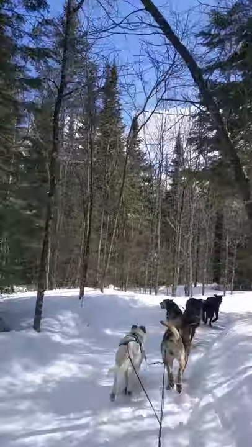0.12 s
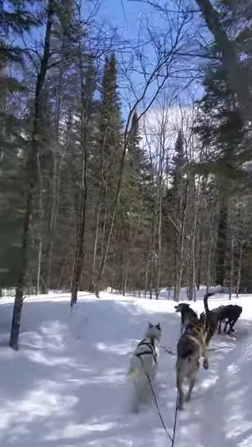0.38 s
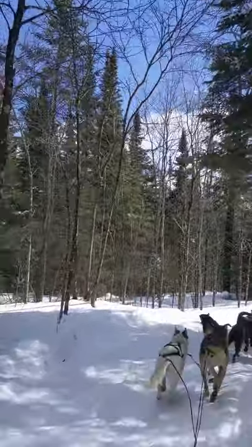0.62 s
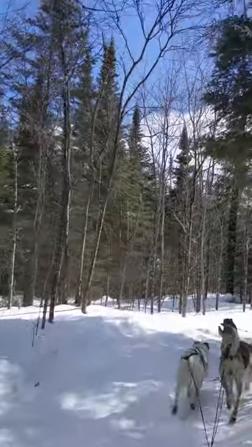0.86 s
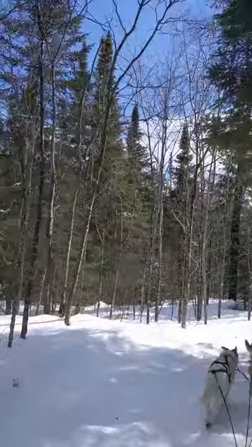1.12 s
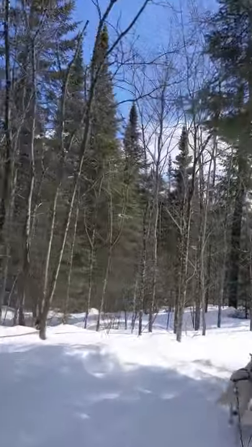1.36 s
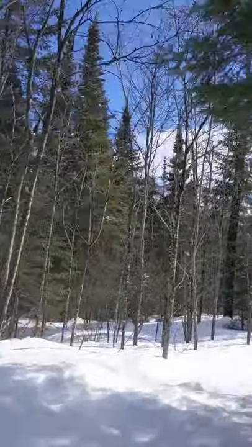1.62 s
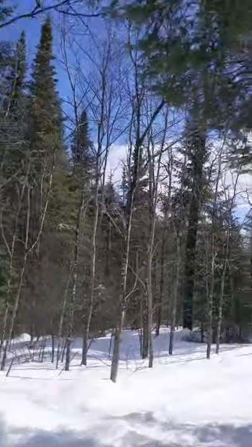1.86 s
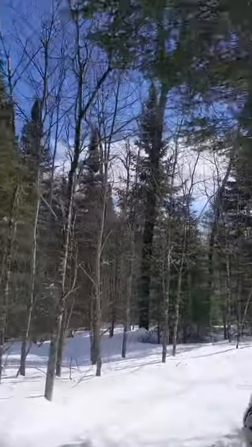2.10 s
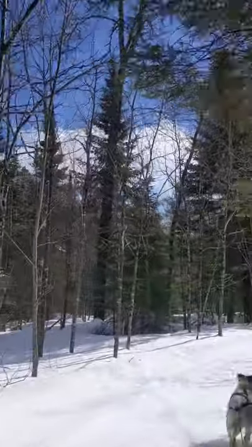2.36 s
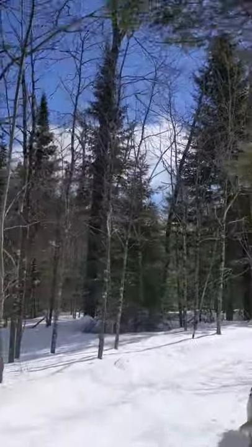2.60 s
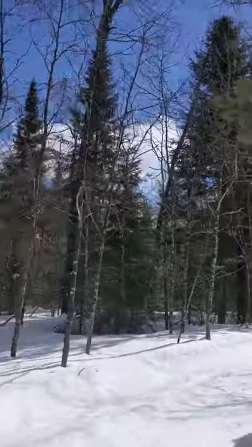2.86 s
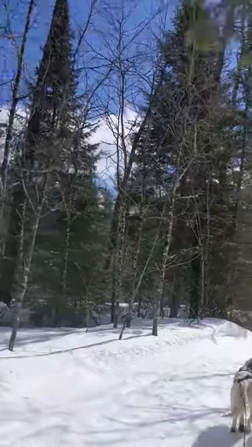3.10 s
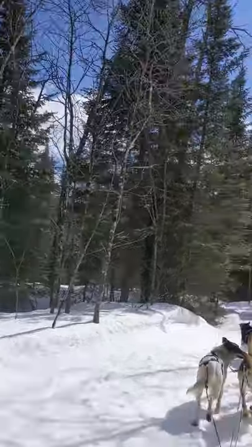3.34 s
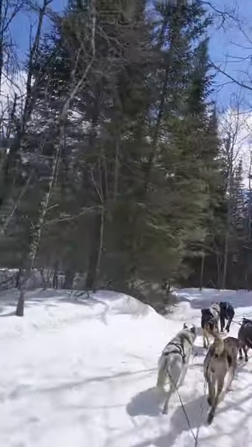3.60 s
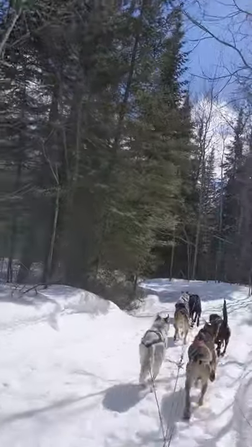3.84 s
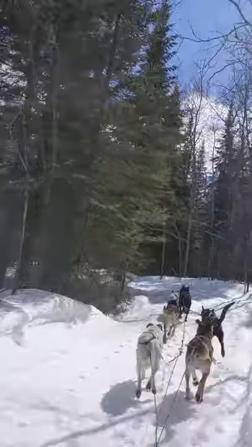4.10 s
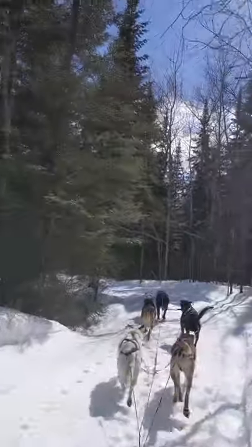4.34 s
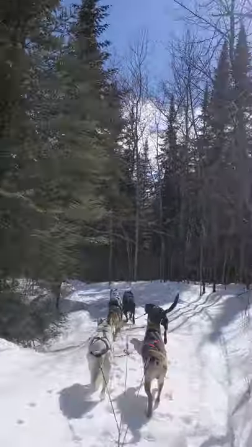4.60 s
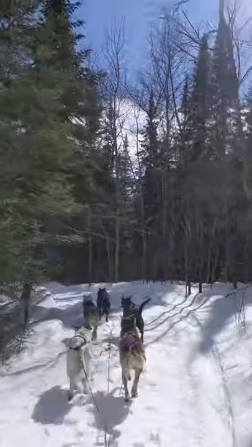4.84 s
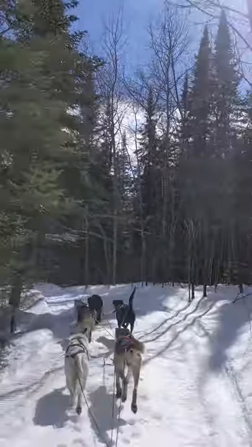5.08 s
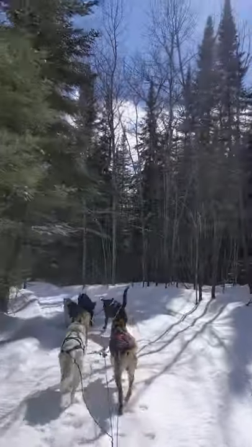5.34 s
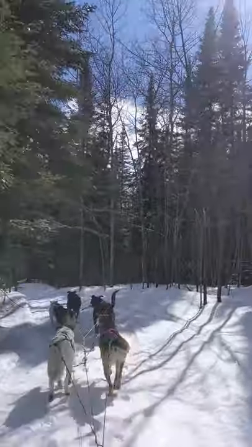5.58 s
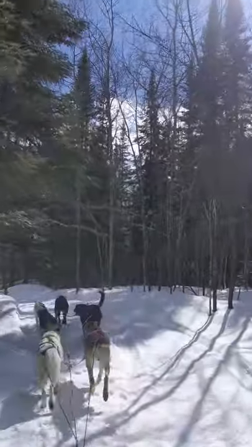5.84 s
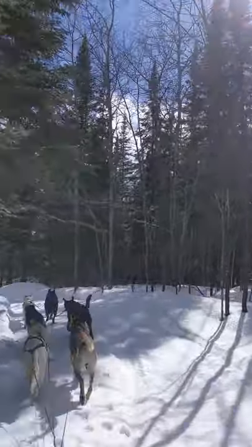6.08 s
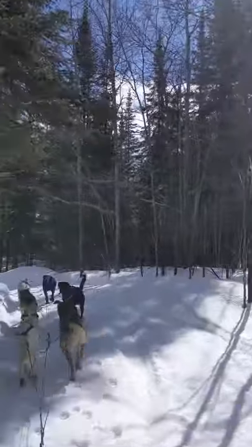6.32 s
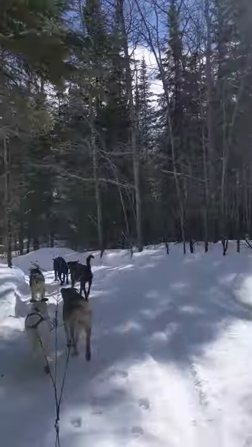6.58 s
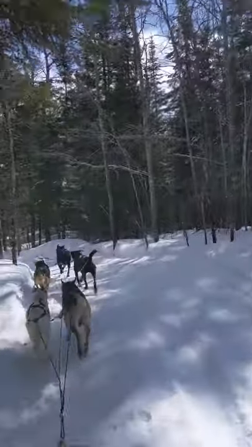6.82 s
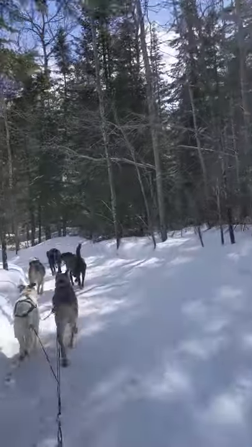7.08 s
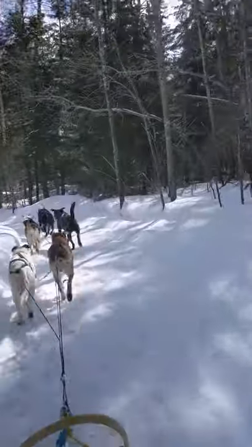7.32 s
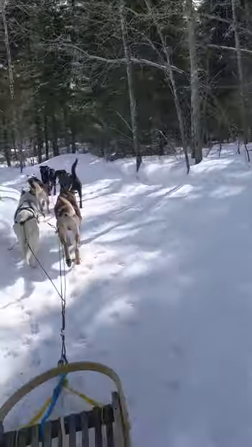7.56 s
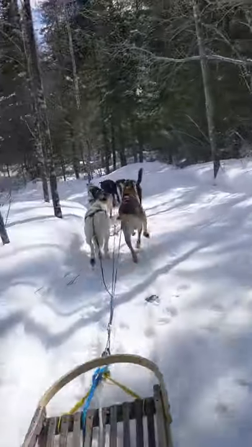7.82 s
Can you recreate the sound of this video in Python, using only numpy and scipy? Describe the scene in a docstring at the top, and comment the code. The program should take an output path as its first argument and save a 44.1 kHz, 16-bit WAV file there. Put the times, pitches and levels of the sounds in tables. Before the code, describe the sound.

A wooden sled pulled over packed snow, heard close and dry from a hand-held phone outdoors. From 0 s, low wind buffets the left side in quick, fuzzy gusts, while the right holds a softer rumble, faint runner hiss and small woody clicks. Wind pops hit around 1.2 and 1.8 s. Near 2.5-2.7 s come swooshes, sharper clicks and hard dull knocks, the loudest at 2.66 s. Wind tears roughly from 2.8 to 3.9 s, with a heavy flapping gust at 3.1-3.2 s and a bright spray of snow. A joint creaks briefly at 4-4.5 s. Gusts weaken after 4.5 s; a knock lands at 5.15 s, and hiss, light scrapes and ticks continue. By 7 s the left wind has almost gone, exposing a cluster of low knocks at 7-7.5 s, then rising snow hiss and fizz to the end at about 7.9 s.

```python
"""Dog sled on packed snow

A wooden dog sled glides over a forest trail, heard from a hand-held phone with two microphone ports.
Wind is shaped noise made separately for each port. Runner hiss, swish and fizz are patchy, grainy noise.
Clicks, scrapes and creaks are noise ringing in the wood; knocks are short low pushes with a crunch of snow."""
import sys
import numpy as np
from scipy import signal
from scipy.fft import rfft, irfft, next_fast_len
from scipy.io import wavfile
from scipy.ndimage import uniform_filter1d

SR = 44100
rng = np.random.default_rng(int(sys.argv[2]) if len(sys.argv) > 2 else 0)


def digitize_waveform(pressure):
    """Quantize a signal to 16-bit integers and store it at the path in sys.argv[1].

    Rows of a 2-D input are taken as channels; values are limited to [-1, 1].
    """
    field = np.atleast_2d(pressure).T
    bounded = np.clip(field, -1, 1)
    quanta = np.round(bounded * 32767).astype(np.int16)
    wavfile.write(sys.argv[1], SR, quanta)


def boost(x):
    """Linear amplitude factor 10**(x/20) for a level x in decibels (scalar or array-like)."""
    u = np.asarray(x, float) / 20
    return 10 ** u


N = 350154  # length in samples
PORT_LAG = 20  # samples by which airborne sound reaches the left port later


def evened(x):
    """Scales to rms 1."""
    return x / np.sqrt(np.mean(x ** 2) + 1e-20)


def read(points, hz):
    """Reads a spectrum in dB, joined on a log-frequency axis."""
    f, value = np.transpose(points)
    return np.interp(np.log(hz + 1), np.log(f + 1), value)


def curves(rows):
    """Columns of a time table, joined by straight lines at every sample."""
    s, *columns = np.transpose(rows)
    return [np.interp(np.arange(N) / SR, s, c) for c in columns]


def colour(x, points):
    """Filters by a spectrum given in dB."""
    size = next_fast_len(N + 4096)
    gain = boost(read(points, np.fft.rfftfreq(size, 1 / SR)))
    return irfft(rfft(x, size) * gain, size)[:N]


def lumps(rate_hz, depth_db):
    """A random gain that wobbles up to about rate_hz, rms 1."""
    lowpass = signal.butter(2, rate_hz, fs=SR, output="sos")
    wobble = signal.sosfilt(lowpass, rng.standard_normal(N))
    return evened(boost(depth_db * np.clip(evened(wobble), -3, 3)))


def resonate(x, hz, width_hz):
    """Lets through a band around hz: shifts hz down to zero, smooths, and shifts back."""
    turn = np.exp(2j * np.pi * np.cumsum(hz * np.ones(len(x))) / SR)
    r = np.exp(-np.pi * width_hz / SR)
    return 2 * (turn * signal.lfilter([1 - r], [1, -r], x / turn)).real


def add(mix, s, sound):
    """Mixes a two-port sound in at s seconds."""
    part = mix[:, round(s * SR):][:, :sound.shape[1]]
    part += sound[:, :part.shape[1]]


def swells(bed_db, rows, rise_s, fall_s):
    """Each row lifts the level out of its bed to a peak, holds it and lets it sink back."""
    t = np.arange(0, N, 64) / SR  # one value every 64 samples is enough
    s, held, peak_db = np.transpose(rows)[:, :, None]
    rising = 1 + (t - s) / rise_s
    falling = 1 - (t - s - held) / fall_s
    share = np.clip(np.minimum(rising, falling), 0, 1)
    bed_points = (bed_db * np.ones(N))[::64]
    lift = (share * np.maximum(peak_db - bed_points, 0)).max(0)
    return bed_db + np.interp(np.arange(N) / SR, t, lift)


def lifted(beds, events, rise_s, fall_s):
    """One swelling level for each bed, from the matching peak column of the events."""
    levels = []
    for k, bed in enumerate(beds):
        rows = [(s, held, peaks[k]) for s, held, *peaks in events]
        levels.append(swells(bed, rows, rise_s, fall_s))
    return levels


def rattle(ms, draw):
    """A hard first contact, then a puff of noise that dies away."""
    u = np.arange(len(draw)) / SR * 1000 / ms
    puff = draw * (np.exp(-2.2 * u ** 2) + 0.2 * np.exp(-.6 * u))
    puff[0] = 7.7
    return puff


def burst(drive, hz, width_hz):
    """The puff ringing near hz."""
    return evened(resonate(resonate(drive, hz, 2 * width_hz), hz, width_hz))


def thump(hz, ms):
    """A short low push, quick to rise and fading over about ms; peak 1."""
    t = np.arange(round(ms * SR / 250)) / SR
    u = t * 1000 / ms
    push = np.sin(2 * np.pi * hz * t) * np.minimum(u / 0.12, 1) * np.exp(-2.5 * u ** 2)
    return push / abs(push).max()


# eddy spectrum against its own pitch: (multiple of the pitch [ratio], level [dB])
EDDY_SHAPE = [(.1, -13), (.3, -5.5), (.7, -2), (1.3, -1.5), (1.9, -8), (2.8, -18), (5, -44)]


def eddies(pitch_hz):
    """Noise whose whole spectrum stretches with the eddy pitch; steady power."""
    frames = N // 256 + 6
    pitch = pitch_hz[np.minimum(np.arange(frames) * 256, N - 1)]
    multiple, db = np.transpose(EDDY_SHAPE)
    ratio = np.fft.rfftfreq(1024, 1 / SR)[:, None] / pitch + 1e-3
    a, b = rng.standard_normal((frames, 513, 2)).T
    shape = boost(np.interp(np.log(ratio), np.log(multiple), db, right=-100)) / np.sqrt(pitch)
    return evened(signal.istft((a + 1j * b) * shape, nperseg=1024, noverlap=768)[1][:N])


# wind on the left port between gusts:
# (time [s], buffeting [dB], eddy pitch when a gust is 5 dB above the lull [Hz], sharp-edged tearing [dB])
LEFT_LULL = [(0.0, -30, 170, -54), (0.76, -29.5, 166, -64), (1.35, -28.5, 169, -54.5), (1.7, -24, 217, -48),
             (2.3, -28, 180, -54), (2.65, -26.5, 179, -46), (2.82, -27.5, 134, -45), (3.05, -26, 193, -37),
             (3.14, -26, 78.4, -31), (3.23, -27, 105, -37), (3.39, -25.5, 232, -27.5),
             (3.8, -26.5, 147, -35.5), (3.95, -25.5, 214, -35), (4.45, -29, 154, -56),
             (5.1, -36.5, 85.5, -61), (5.33, -40, 94, -53), (5.55, -33, 134, -50), (5.85, -37, 104, -55),
             (6.45, -32.5, 101, -60), (6.95, -55, 89.5, -54), (7.1, -50, 170, -54), (7.5, -53, 163, -54),
             (7.66, -49, 175, -52.5), (7.93, -48, 220, -46)]
# gusts on the left port: (top reached [s], held [s], buffeting [dB], tearing [dB])
LEFT_GUSTS = [(.14, 0.034, -23.5, -45), (.27, 0.054, -22, -55), (0.431, .11, -24, -50),
              (.66, 0.018, -22.5, -42), (0.842, 0.076, -19.5, -36), (.97, 0.11, -25.5, -44),
              (1.099, 0.12, -19, -38.5), (1.2, 0.089, -18.5, -37.5), (1.41, 0.014, -25, -44),
              (1.54, 0.073, -18, -33), (1.68, 0.056, -19.5, -33.5), (1.82, 0.066, -18.5, -32.5),
              (1.94, .05, -22, -50), (2.03, 0.023, -22.5, -35), (2.19, 0.039, -24.5, -49),
              (2.328, 0.026, -18, -26), (2.49, 0.0033, -23, -31.5), (2.55, 0.16, -24, -36.5),
              (2.829, 0.013, -18, -32), (2.99, .05, -21, -29), (3.059, 0.034, -18.5, -18),
              (3.12, 0.047, -16, -23), (3.27, 0.057, -19.5, -25), (3.34, 0.071, -20.5, -25),
              (3.54, 0.058, -20, -25.5), (3.73, 0.036, -19.5, -25.5), (3.82, 0.1, -22, -31),
              (3.91, 0.13, -22, -32), (4.068, 0.034, -23.5, -40), (4.169, 0.048, -23, -35.5),
              (4.36, 0.014, -19, -35), (4.52, 0.0046, -22.5, -41), (4.65, 0.16, -28.5, -51),
              (4.85, .18, -30.5, -56), (5.11, 0.067, -35, -57), (5.381, 0.0077, -29.5, -53),
              (5.461, 0.022, -23, -57), (5.549, .005, -22, -45), (5.64, 0.037, -27, -41),
              (5.78, 0.0039, -28.5, -55), (5.88, 0.0046, -29, -53), (5.98, .02, -28.5, -54),
              (6.07, .11, -31.5, -54), (6.26, .09, -28, -51), (6.51, 0.019, -30.5, -55),
              (6.619, 0.0029, -29, -53), (6.7, 0.026, -33.5, -55), (6.87, 0.0042, -35, -51),
              (6.98, 0.016, -45, -47), (7.25, 0.0044, -43, -48), (7.33, 0.0042, -42, -49),
              (7.43, .005, -47, -44), (7.56, 0.017, -42, -51)]
# spectrum of the torn edges: (frequency [Hz], density [dB per Hz])
TEARING_COLOUR = [(100, -28), (250, -4), (450, -1), (700, -12.5), (1100, -23.5), (1700, -36.5), (4000, -64)]
# spectrum of the higher rasp in strong tearing: (frequency [Hz], density [dB per Hz])
RASP_COLOUR = [(400, -28), (800, 1.5), (1300, -5), (2000, -17), (3500, -45)]


def wind_left():
    """Eddies shed at the port: a fuzzy pitch that climbs with the gusts, torn at its edges."""
    lull_db, lull_hz, edge_db = curves(LEFT_LULL)
    buffet_db, tear_db = lifted([lull_db, edge_db], LEFT_GUSTS, rise_s=0.052, fall_s=0.059)
    octaves_per_db = 0.0379  # eddies climb as a gust lifts out of the lull
    eddy_hz = lull_hz * 2 ** (octaves_per_db * (buffet_db - lull_db - 5))
    shreds = rng.standard_normal(N) * lumps(72, 3.3)
    buffeting = boost(buffet_db) * eddies(eddy_hz) * lumps(23, 1.2)
    tearing = boost(tear_db) * evened(colour(shreds, TEARING_COLOUR))
    rasp_db = -48 + 1.5 * (tear_db + 23)  # rasp grows faster than the tearing, in dB
    rasp = boost(rasp_db) * evened(colour(shreds, RASP_COLOUR))
    return np.array([buffeting + tearing + rasp, np.zeros(N)])


# wind on the sheltered right port between jolts and puffs: (time [s], low rumble [dB], flutter [dB])
RIGHT_LULL = [(0.0, -46, -44.5), (.4, -44, -48), (1.0, -41, -49.5), (1.7, -35, -48), (2.2, -38, -51),
              (2.8, -35, -50), (3.4, -37, -58), (3.9, -41, -48), (4.45, -41, -50.5), (4.75, -45, -51),
              (5.35, -44, -55), (5.6, -35, -58.5), (6.1, -52, -44), (6.6, -41, -45), (7.1, -54, -45),
              (7.5, -36.5, -41.5), (7.73, -46.5, -45), (7.93, -36, -36)]
# jolts of the sled and puffs that reach the right port: (top reached [s], held [s], rumble [dB], flutter [dB])
RIGHT_JOLTS = [(.13, .02, -29.5, -50), (1.9, .03, -37, -40), (2.47, .02, -35, -49), (2.66, .01, -35, -28),
               (3.1, 0.19, -33, -41), (3.84, 0.087, -40, -39), (4.85, 0.15, -39.5, -49),
               (5.16, .01, -33, -46), (6.27, .05, -40, -39.5), (6.8, 0.037, -31.5, -39.5),
               (6.99, 0.0043, -26.5, -35), (7.23, .02, -43, -36), (7.37, 0.036, -39, -31),
               (7.65, 0.022, -47, -37)]
# spectrum of the rumble: (frequency [Hz], density [dB per Hz])
RUMBLE_COLOUR = [(15, -23), (45, 13.5), (100, 3), (200, -0.5), (400, -26), (1500, -80)]
# spectrum of the flutter: (frequency [Hz], density [dB per Hz])
FLUTTER_COLOUR = [(100, -0.5), (230, 3), (500, -7), (900, -10), (2000, -23.5), (6000, -72)]


def wind_right():
    """Sheltered wind: low rumble and higher flutter, both lumpy noise lifted by jolts of the sled and puffs."""
    rumble_db, flutter_db = lifted(curves(RIGHT_LULL), RIGHT_JOLTS, rise_s=0.1, fall_s=0.054)
    rumble = colour(rng.standard_normal(N) * lumps(13, 3.2), RUMBLE_COLOUR)
    flutter = colour(rng.standard_normal(N) * lumps(69, 4.6), FLUTTER_COLOUR)
    right = boost(rumble_db) * evened(rumble) + boost(flutter_db) * evened(flutter)
    return np.array([np.zeros(N), right])


def patchy(patch_db, crunch, grains_per_s, spread_db):
    """White noise with drifting patches, mixed with crunching snow grains; crunch is their power share."""
    hop, size = 128, 512  # samples
    frames = N // hop + 6
    a, b, patches = rng.standard_normal((frames, size // 2 + 1, 3)).T
    patches = evened(uniform_filter1d(uniform_filter1d(patches, 8, 0), 14, 1))
    bed = signal.istft((a + 1j * b) * boost(patch_db * patches), nperseg=size, noverlap=size - hop)[1][:N]
    strength = boost(spread_db * np.minimum(rng.exponential(1, N), 4))
    train = (rng.random(N) < grains_per_s / SR) * strength
    fading = signal.lfilter([1], [1, -np.exp(-1 / (0.0013 * SR))], train)  # each grain dies in 1.3 ms
    grains = rng.standard_normal(N) * fading
    crunch = np.clip(crunch, 0, 1)
    return np.sqrt(1 - crunch) * evened(bed) + np.sqrt(crunch) * evened(grains)


def ports(near, other, left_colour, right_colour):
    """The left port hears the same grains a little later, mixed with its own."""
    alike = .6
    far = alike * np.roll(near, PORT_LAG) + np.sqrt(1 - alike ** 2) * other
    return np.array([colour(far, left_colour), colour(near, right_colour)])


# runner hiss at the left port: (frequency [Hz], density [dB per Hz])
HISS_LEFT_COLOUR = [(300, -4), (800, -9.5), (1700, -10.5), (2600, -13), (3200, -36), (6000, -70),
                    (15000, -45)]
# runner hiss at the right port: (frequency [Hz], density [dB per Hz])
HISS_RIGHT_COLOUR = [(300, -3), (800, -0.5), (1700, 2.5), (2550, -0.5), (3200, -2.5), (5200, -7),
                     (6300, -9.5), (7500, -18.5), (12500, -19.5), (15000, -24), (15500, -50)]


def runner_hiss(db):
    """Runners rubbing over snow: slightly patchy noise, its level set at the right port."""
    near, other = patchy(1.67, 0.14, 300, 4.8), patchy(1.1, .15, 300, 3.4)
    hiss = ports(near, other, HISS_LEFT_COLOUR, HISS_RIGHT_COLOUR)
    return boost(db) * hiss / hiss[1].std()


# swish at the left port: (frequency [Hz], density [dB per Hz])
SWISH_LEFT_COLOUR = [(1000, 7.5), (2600, -9), (3500, -22), (4300, 1), (5200, -15), (6200, -22), (7800, 2),
                     (10000, -1)]
# swish at the right port: (frequency [Hz], density [dB per Hz])
SWISH_RIGHT_COLOUR = [(1000, -38), (3400, 7), (4300, 6), (5200, 1), (6500, -3), (9000, 0), (12500, -7),
                      (15000, -22)]


def loose_snow_swish(db):
    """Loose snow swishing past: patchier noise, its level set at the left port."""
    near, other = patchy(6.4, .15, 400, 5.4), patchy(1.8, .15, 370, 4.7)
    swish = ports(near, other, SWISH_LEFT_COLOUR, SWISH_RIGHT_COLOUR)
    return boost(db) * swish / swish[0].std()


# spray fizz at the left port: (frequency [Hz], density [dB per Hz])
FIZZ_LEFT_COLOUR = [(6000, -9.5), (7500, -10), (8500, -6.5), (10000, 3), (12500, 3), (15000, 1.5),
                    (16000, -6)]
# spray fizz at the right port: (frequency [Hz], density [dB per Hz])
FIZZ_RIGHT_COLOUR = [(7000, -51), (9000, -29), (12500, -25), (15000, -19), (15500, -50)]


def spray_fizz(db):
    """Fine spray: very high grainy noise, lumpy in level and set at the left port."""
    near, other = patchy(2.5, 0.21, 500, 1.7), patchy(2.2, 0.27, 500, 4.0)
    fizz = ports(near, other, FIZZ_LEFT_COLOUR, FIZZ_RIGHT_COLOUR)
    return boost(db) * fizz / fizz[0].std() * lumps(13.4, 0.55)


# a narrow singing of the runners: (time [s], level [dB])
SINGING_LEVEL = [(0, -56.5), (2.8, -58.5), (3.6, -62.5), (7.93, -74)]


def runner_singing():
    """Noise squeezed into a narrow band sings faintly at the right port."""
    hz, width_hz = 2550, 220
    tone = resonate(resonate(rng.standard_normal(N), hz, width_hz), hz, width_hz)
    right = boost(curves(SINGING_LEVEL)[0]) * evened(tone) * lumps(23, 1.1)
    return np.array([np.zeros(N), right])


# steady glide: (time [s], runner hiss at the right port [dB], fine fizz at the left port [dB])
GLIDE = [(0.0, -47.5, -53.5), (.9, -48, -54.5), (1.4, -48, -55), (1.9, -43.5, -52.5), (2.3, -44, -51),
         (2.8, -49.5, -53), (3.0, -45, -44.5), (3.45, -44, -47.5), (3.9, -49, -56), (4.6, -50, -55),
         (5.05, -53, -56.5), (5.4, -47.5, -50.5), (5.95, -52.5, -57), (6.6, -50, -54.5), (7.1, -53, -50.5),
         (7.45, -46, -48.5), (7.68, -46.5, -40), (7.93, -43, -40)]
# swooshes through loose snow:
# (top reached [s], held [s], hiss at the right port [dB], fizz at the left port [dB], swish there [dB])
SNOW_SWOOSHES = [(.2, 0.072, -45.5, -52.5, -57), (.63, .09, -45.5, -49, -59), (1.01, .005, -42, -49, -69),
                 (1.2, .01, -45.5, -54, -60), (1.38, 0.04, -46, -56, -56), (1.69, 0.063, -43.5, -50, -66),
                 (1.96, 0.014, -40, -50, -64), (2.13, 0.055, -47.5, -51.5, -76),
                 (2.36, 0.051, -46, -49.5, -55), (2.47, 0.0046, -38.5, -47.5, -63),
                 (2.56, 0.0075, -36.5, -41, -61), (2.66, 0.0044, -39.5, -46.5, -65),
                 (2.75, .18, -49, -49, -60), (2.93, .005, -46.5, -51, -52), (3.07, .06, -45, -38, -43),
                 (3.18, 0.079, -41.5, -36, -37), (3.32, 0.066, -41, -45, -64),
                 (4.05, 0.032, -46, -46.5, -47), (4.39, .02, -44.5, -49.5, -57),
                 (4.45, 0.041, -44.5, -46, -57), (4.67, 0.0046, -49, -54, -68), (4.92, .04, -47, -56, -75),
                 (5.16, .005, -48, -53, -52), (5.24, 0.085, -48.5, -48.5, -56.5),
                 (5.58, 0.067, -47, -50.5, -63), (5.78, 0.024, -50, -49.5, -69),
                 (6.05, 0.21, -46.5, -54.5, -72), (6.27, 0.013, -42, -48.5, -61),
                 (6.46, 0.012, -47, -58, -58), (6.82, .02, -45.5, -53, -68), (6.98, 0.0045, -49, -48, -51),
                 (7.14, .005, -55, -48, -60), (7.32, 0.095, -44, -50.5, -54),
                 (7.58, 0.022, -43.5, -44.5, -61), (7.66, 0.053, -50, -42, -51.5)]


def snow():
    """A steady glide lifted by swooshes; each port colours the snow in its own way."""
    swish_bed_db = -63  # between swooshes
    beds = [*curves(GLIDE), swish_bed_db]
    hiss_db, fizz_db, swish_db = lifted(beds, SNOW_SWOOSHES, rise_s=0.067, fall_s=.07)
    return runner_hiss(hiss_db) + loose_snow_swish(swish_db) + spray_fizz(fizz_db) + runner_singing()


# dull knocks: (time [s], pitch [Hz], length [ms], left thump peak [dB], right thump peak [dB])
DULL_KNOCKS = [(0.167, 204, 12, -50, -32), (2.4737, 260, 9, -45, -24), (2.612, 204, 11, -45, -26),
               (2.6555, 500, 3.8, -43, -17), (2.661, 325, 5.1, -41, -14.5), (2.6766, 570, 7.2, -43, -23),
               (3.2038, 269, 8.3, -42, -22), (3.8348, 204, 8.5, -50, -24), (5.1474, 253, 18, -41, -29.5),
               (5.1649, 546, 4.2, -47, -19), (5.1655, 970, 5.4, -50, -17), (5.3114, 215, 13, -49, -29.5),
               (6.044, 301, 5.6, -48, -29), (6.4797, 258, 5.8, -49, -28.5), (6.5745, 240, 11, -31, -28),
               (6.971, 250, 3.3, -36, -22), (7.008, 193, 17, -49, -26), (7.09, 203, 16, -36, -37),
               (7.13, 215, 7, -31, -46), (7.159, 224, 23, -34, -36), (7.2234, 256, 7.2, -23, -26),
               (7.309, 308, 9, -39, -21), (7.367, 250, 8.2, -47, -35), (7.402, 224, 15, -25, -32),
               (7.524, 255, 14, -46, -33)]


def knocks():
    """Low pushes of the frame, each with a quieter crunch of crushed snow."""
    out = np.zeros((2, N))
    crunch_db, crunch_ms = -10.5, 8.3  # level against the thump
    band = signal.butter(2, [250, 1300], "band", fs=SR)
    for s, hz, ms, left_db, right_db in DULL_KNOCKS:
        port_db = np.array([left_db, right_db])
        crunch = signal.lfilter(*band, rattle(crunch_ms, rng.standard_normal(2000)))
        add(out, s, np.outer(boost(crunch_db + port_db), crunch / abs(crunch).max()))
        add(out, s, np.outer(boost(port_db), thump(hz, ms)))
    return out


# bright ticks: (time [s], pitch [Hz], length [ms], peak at the left port [dB])
BRIGHT_TICKS = [(.2451, 14000, 3, -41), (.6303, 12900, 7, -28), (.6544, 12690, 5, -32),
                (2.559, 12300, 8, -27), (2.9236, 12700, 8, -32), (3.5314, 11600, 3, -29),
                (4.0288, 13300, 4.4, -28), (5.7641, 13370, 3, -26.5), (5.8434, 11700, 5.9, -36),
                (5.8679, 11800, 3, -35), (6.2675, 9550, 5.6, -37), (6.8777, 12500, 6, -33)]


def ticks():
    """Tiny rattles ringing very high, a tenth as strong at the right port."""
    out = np.zeros((2, N))
    treble = signal.butter(3, 9000, "high", fs=SR)
    for s, hz, ms, db in BRIGHT_TICKS:
        drive = rattle(ms, rng.standard_normal(1200))
        tick = burst(drive, hz, 1000) + 0.5 * evened(signal.lfilter(*treble, drive))
        add(out, s, np.outer([1, .1], boost(db) * tick / abs(tick).max()))
    return out


# what the frame rings with: (pitch [Hz], filter width [Hz], level before reach and chance [dB])
FRAME_MODES = [(1280, 350, -1.5), (1500, 410, 3), (1870, 380, 2), (2100, 230, -3), (2365, 400, 1),
               (2860, 380, -2.5), (3600, 300, -2), (4900, 510, 3)]


def click(db, hz, ms, draw, chance):
    """A rattle rings the frame's modes, most those near the struck place."""
    drive = rattle(ms, draw)
    crack = signal.lfilter(*signal.butter(2, 6000, fs=SR), drive)
    ring = 0
    for (mode_hz, width_hz, mode_db), c in zip(FRAME_MODES, chance):
        # modes away from the struck place ring less: 22 dB per octave, at most 20 dB
        reach_db = max(-22 * abs(np.log2(mode_hz / hz)), -20)
        ring = ring + boost(mode_db + 2.5 * c + reach_db) * burst(drive, mode_hz, width_hz)
    sound = evened(ring) + 0.046 * evened(crack)
    sound *= boost(db) / abs(sound).max()
    left_db = -21  # against the right port
    return np.array([boost(left_db) * np.roll(sound, PORT_LAG), sound])


# small clicks of frame and lines: (time [s], peak at the right port [dB], struck place [Hz], length [ms])
SMALL_CLICKS = [(0.249, -31, 4470, 3.1), (.4315, -33, 2210, 4.4), (0.531, -33.5, 2500, 1.6),
                (.6134, -24, 3100, 2.1), (.974, -34.5, 4900, 2.3), (1.0038, -25, 2800, 4.6),
                (1.016, -30, 2150, 11), (1.3627, -31, 4900, 2), (1.5164, -24.5, 2460, 3.4),
                (1.6413, -32, 4600, 2.1), (1.7, -21, 2710, 3.8), (1.942, -18.5, 2250, 6.1),
                (2.4477, -24, 1750, 1.9), (2.476, -27, 2000, 2.6), (2.498, -29, 2920, 3),
                (2.5378, -24, 1680, 14), (2.5658, -21, 1620, 2.4), (2.6617, -10.5, 1390, 1.3),
                (2.9216, -18, 2150, 4.7), (2.9212, -23.5, 3600, 3.5), (3.854, -29, 1900, 5.3),
                (4.6657, -19.5, 1930, 2.4), (4.8312, -31, 2100, 4.6), (5.1015, -24, 2043, 5.7),
                (5.1659, -26, 1300, 3.1), (5.254, -27.5, 2230, 9.2), (5.3246, -30.5, 2500, 3.9),
                (5.5831, -29.5, 4560, 2.5), (5.6381, -32, 2290, 5.4), (6.0445, -28.5, 4430, 3.8),
                (6.1302, -25, 1300, 1.7), (6.1305, -36, 4900, 1.5), (6.2383, -30, 1500, 2.4),
                (6.276, -36, 3600, 3), (6.305, -36, 3700, 5), (6.529, -25.5, 2320, 5.2),
                (6.5753, -36, 2400, 6), (6.9725, -36, 1350, 3.2), (7.224, -28, 1550, 5.2)]


def clicks():
    """The listed clicks of frame and lines, and 24 faint ones at random moments."""
    out = np.zeros((2, N))
    faint = []
    for a, b, c, d in rng.random((24, 4)):
        faint.append((a * N / SR, -40 + 5 * b, 1400 * 4.3 ** c, 7.1 * (.5 + d)))
    for s, db, hz, ms in SMALL_CLICKS + faint:
        draw = rng.standard_normal(1200)
        add(out, s, click(db, hz, ms, draw, draw[-len(FRAME_MODES):]))
    return out


# banded scrapes:
# (centre [s], half length [s], main band at the right port [dB], main band [Hz], second band [Hz])
BANDED_SCRAPES = [(3.11, 0.054, -53, 4460, 3200), (3.22, 0.064, -46.5, 4470, 3000),
                  (4.7, 0.062, -52, 1830, 3400), (4.1, 0.095, -49, 1750, 4100),
                  (6.27, 0.062, -46, 1550, 3540), (2.55, 0.02, -37.5, 1800, 1300),
                  (0.43, .025, -45, 950, 970), (.7, 0.024, -48, 2100, 900)]


def scrapes():
    """Rough rubbing that sings in two fuzzy bands and swells then fades."""
    t, out = np.arange(N) / SR, np.zeros(N)
    rub = patchy(1.4, 0.68, 300, 2.4)
    for s, half, db, main_hz, second_hz in BANDED_SCRAPES:
        main = evened(resonate(resonate(rub, main_hz, 600), main_hz, 600))
        second = evened(resonate(resonate(rub, second_hz, 600), second_hz, 600))
        swell = np.exp(-((t - s) / half) ** 2)
        out += boost(db) * swell * (main + .6 * second)
    return np.array([.5 * np.roll(out, PORT_LAG), out])


# sharp wind pops on the left port: (time [s], peak [dB])
WIND_POPS = [(1.196, -24), (1.588, -37), (1.769, -23), (1.807, -20), (1.835, -16.5), (2.307, -25),
             (3.627, -21), (3.739, -20), (3.923, -17)]


def pops():
    """Sudden pushes of wind at the left port, a few thousandths of a second long."""
    out = np.zeros((2, N))
    for s, db in WIND_POPS:
        add(out, s, np.outer([1, 0], boost(db) * thump(590, 4.5)))
    return out


# one slow flapping gust on the left port: (start [s], end [s], flap rate [Hz], approximate peak [dB])
FLAPPING_GUST = (3.1215, 3.2, 64, -9)


def flap():
    """Lopsided pressure swings: sharp crests, round troughs."""
    start, end, hz, peak_db = FLAPPING_GUST
    t = np.arange(0, end - start, 1 / SR)
    turn = 2 * np.pi * hz * t
    swing = -np.cos(turn) + 0.17 * np.cos(2 * turn) - 0.16 * np.cos(4.0 * turn)
    out = np.zeros((2, N))
    add(out, start, np.outer([1, 0], boost(peak_db) * swing * signal.windows.tukey(len(t), .25)))
    return out


# slips of a creaking joint: (time [s], peak at the right port [dB])
JOINT_SLIPS = [(3.986, -32), (4.03, -26.5), (4.05, -28), (4.073, -29.5), (4.404, -32), (4.488, -35),
               (4.51, -33), (6.276, -49)]
# the joint's modes: (pitch [Hz], level [dB], time to die by 60 dB [s])
JOINT_MODES = [(1770, 0, 0.026), (3620, 0.5, 0.012), (5870, -14, .015)]


def joint_slips():
    """Each slip of a wooden joint is a rattle that sets its modes ringing."""
    out = np.zeros((2, N))
    t = np.arange(2000) / SR
    ring = sum(boost(db - 60 * t / t60) * np.sin(2 * np.pi * hz * t) for hz, db, t60 in JOINT_MODES)
    for s, db in JOINT_SLIPS:
        slip = signal.oaconvolve(ring, rattle(4.1, rng.standard_normal(2000)))
        slip *= boost(db) / abs(slip).max()
        add(out, s, np.array([0.57 * np.roll(slip, PORT_LAG), slip]))
    return out


def scene():
    """Wind, snow and the sled's small noises."""
    wind = wind_left() + wind_right() + pops() + flap()
    sled = knocks() + ticks() + clicks() + scrapes() + joint_slips()
    return wind + snow() + sled


def low_pass(x):
    """Removes everything above the highest recorded frequency."""
    return signal.sosfilt(signal.butter(12, 16520, fs=SR, output="sos"), x)


def record(dry):
    """The phone's band limit: a steep filter removes what lies above 15850 Hz."""
    edge = signal.firwin(511, 15850, window=("kaiser", 9), fs=SR)
    mix = signal.oaconvolve(dry, edge[None], "same")
    return low_pass(mix)


dry = scene()
out = record(dry)
digitize_waveform(out)
```